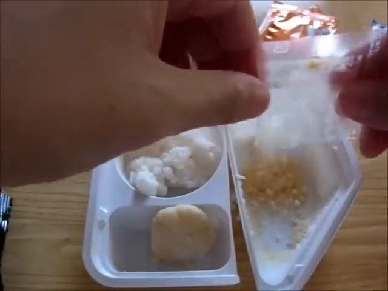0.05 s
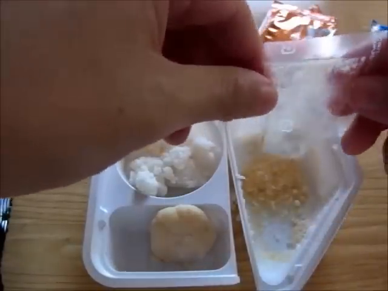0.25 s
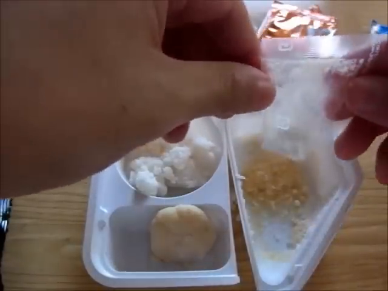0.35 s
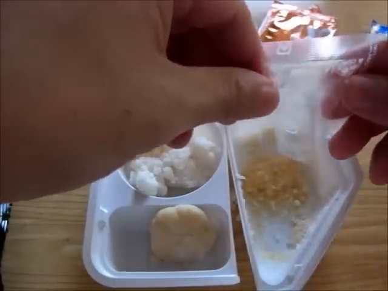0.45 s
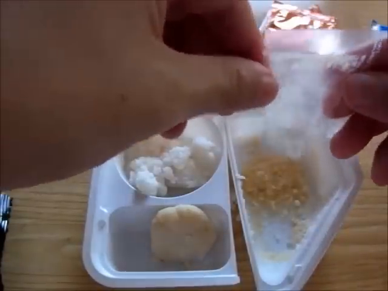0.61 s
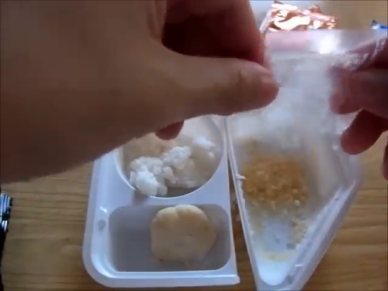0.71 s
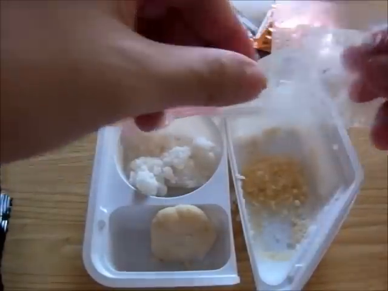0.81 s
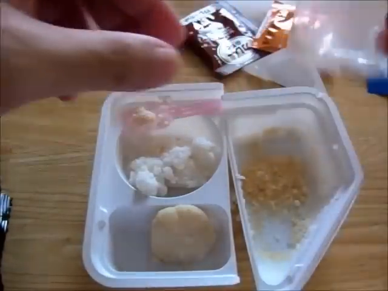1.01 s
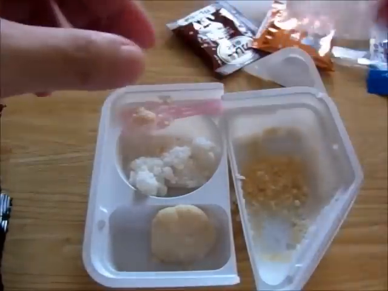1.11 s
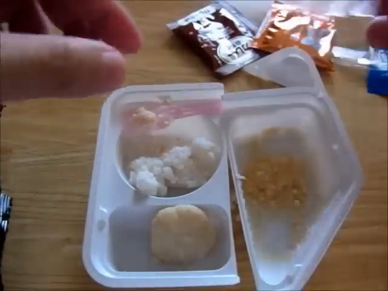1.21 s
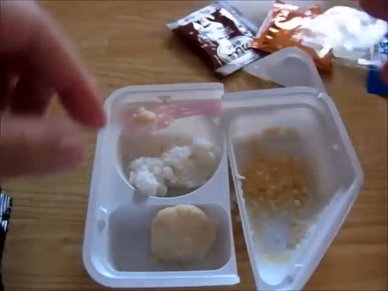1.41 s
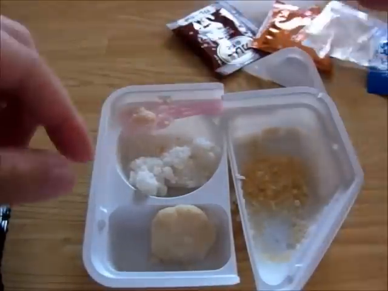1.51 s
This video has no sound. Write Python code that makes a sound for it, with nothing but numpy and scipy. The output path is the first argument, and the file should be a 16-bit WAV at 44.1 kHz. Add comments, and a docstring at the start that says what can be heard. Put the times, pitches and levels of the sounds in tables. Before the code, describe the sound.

A thin plastic sachet crinkles sharply between fingers in a quiet room, over faint hiss

```python
"""Sharp snaps of a thin plastic sachet worked by fingers, amid fine rustling and a faint steady hiss. Each snap
is a crease giving way: sines and bright modes that swell and die within a few milliseconds. Rustle is a stream
of tiny ringing clicks over dull noise; flurries are short runs of filtered clicks. Soft low and middle bumps
follow the flexing pouch, and the film now and then swells into a longer ring. Shaped noise and a thin high tone
make the background, and a near echo with a short noise tail places the sachet in a quiet room."""
import sys
import numpy as np
from scipy import signal
from scipy.fft import rfft, irfft
from scipy.io import wavfile

SR = 44100
rng = np.random.default_rng(int(sys.argv[2]) if len(sys.argv) > 2 else 0)


def bounce(signal):
    """Save signal as a 16-bit WAV file at the path given by the first command-line argument."""
    frames = np.transpose(np.atleast_2d(signal))
    limited = np.clip(frames, -1, 1)
    pcm = np.round(limited * 32767).astype(np.int16)
    wavfile.write(sys.argv[1], SR, pcm)


N = 68355  # length in samples


def amp(db):
    """Turn decibels into a gain."""
    return 10 ** (np.asarray(db) / 20)


def rms_one(x):
    """Scale a sound to an average (rms) level of 1."""
    return x / np.sqrt(np.mean(x ** 2) + 1e-20)


def bandpass(low_high_hz, x):
    """Keep the part of a sound between two frequencies."""
    return signal.sosfilt(signal.butter(2, low_high_hz, "band", fs=SR, output="sos"), x)


def add_at(out, s, x):
    """Add a short sound into a longer one, starting at s seconds."""
    out[int(s * SR):][:len(x)] += x


def burst(wave, rise, decay, t):
    """Quick swell and exponential fall, with the same energy as 1.5 ms at rms 1."""
    x = wave * (1 - np.exp(-(t / rise) ** 2)) * np.exp(-t / decay)
    return x / np.sqrt(np.sum(x ** 2) / (.0015 * SR))


HISS_DB, HISS_TOP_HZ = -53.5, 15850
WHINE_DB, WHINE_HZ = -74, 15502
# The colour of the room and microphone hiss.
# Each row: frequency in Hz, level in dB relative to the other rows.
HISS_COLOUR = [(25, -10), (193, -4.5), (281, -2.5), (648, -8.5), (826, -7), (1200, -9.5), (1900, -11),
               (4380, -14), (15500, -16)]


def hiss():
    """Steady room and microphone noise, coloured by frequency, plus a thin electrical tone."""
    at_hz, db = np.transpose(HISS_COLOUR)
    hz = np.fft.rfftfreq(N, 1 / SR) + 1  # the 1 keeps the logarithm finite
    colour = amp(np.interp(np.log(hz), np.log(at_hz), db)) * (hz < HISS_TOP_HZ)
    noise = irfft(rfft(rng.standard_normal(N)) * colour, N)
    whine = np.sin(2 * np.pi * WHINE_HZ * np.arange(N) / SR)
    return amp(HISS_DB) * rms_one(noise) + amp(WHINE_DB) * whine


ROOM_DB, ROOM_T60_S = -23, .18  # tail level; time for the tail to fall by 60 dB
# The near echo of the sachet.
# Each row: delay in seconds, level in dB against the direct sound.
NEAR_ECHOES = [(.0017, -16.5)]


def surroundings(x):
    """Sound returns as a near echo, then as many weak reflections that fade like decaying noise."""
    t = np.arange(SR // 4) / SR
    tail = rng.standard_normal(len(t)) * amp(-60 * t / ROOM_T60_S) * (t > .004)
    response = amp(ROOM_DB) * tail / np.sqrt(SR * ROOM_T60_S / 14)  # the root evens out tail length
    response[0] = 1  # direct sound
    for s, db in NEAR_ECHOES:
        response[int(s * SR)] += amp(db)
    return signal.fftconvolve(x, response)[:N]


PUFF_RISE_SHARE = .6  # swell time as a share of the decay time
# Soft swells: low and middle ones as the pouch flexes, and two bright ones near 3.3-3.5 kHz where the film
# rings longer. # Each row: start in seconds, level in dB, pitch in Hz, decay in cycles.
SOFT_SWELLS = [(.2315, -38, 940, 0.6), (.4025, -37.5, 780, 0.99), (.4585, -36, 363, 0.63),
               (.4595, -32.5, 3270, 5.3), (.6, -37, 305, .6), (.705, -41, 763, 2.2),
               (.7702, -26, 3540, 3.5), (.822, -37.5, 850, 3.3), (1.371, -54, 490, 1.3),
               (1.391, -47, 363, 3.3), (1.392, -46, 188, 1.3)]


def puffs():
    """The flexing pouch and, now and then, the film give soft swells; the longer the ring, the slower the
    swell."""
    t, out = np.arange(4096) / SR, np.zeros(N + SR)
    for s, db, hz, cycles in SOFT_SWELLS:
        decay = cycles / hz
        wave = np.sin(2 * np.pi * hz * t)
        add_at(out, s, amp(db) * burst(wave, PUFF_RISE_SHARE * decay, decay, t))
    return out[:N]


FLURRY_PER_S = 4000  # average clicks per second inside a flurry
FLURRY_SPREAD = .24  # half-width of the bright band, as a natural log of frequency
FILM_BAND_HZ = (2900, 4900)
# Flurries of tiny crackles.
# Each row: start in seconds, length in seconds, bright level in dB, bright centre in Hz, film level in dB.
CRACKLE_FLURRIES = [(0.471, 0.0063, -52, 9000, -47), (0.613, 0.0034, -41, 10500, -61),
                    (.621, 0.021, -50, 11500, -52.5), (0.6564, 0.0039, -39, 8500, -32),
                    (.672, 0.011, -50, 10500, -43.5), (0.793, .022, -44.5, 7400, -60),
                    (.822, 0.004, -48, 7000, -44.5), (0.968, .015, -45.5, 10000, -48),
                    (1.014, 0.0099, -54, 11500, -58), (1.045, 0.023, -53, 10400, -56),
                    (1.37, 0.0086, -43.5, 6800, -47.5), (1.392, 0.013, -49, 12800, -49),
                    (1.407, 0.011, -47, 11800, -56), (1.417, 0.0075, -49, 12000, -57),
                    (1.442, 0.011, -54, 11500, -56), (1.494, 0.0035, -49, 13000, -66),
                    (1.505, .01, -47.5, 11000, -57.5)]


def flurries():
    """Short runs of uneven clicks, heard as a bright band and through the film's own ring."""
    t, out = np.arange(2048) / SR, np.zeros(N + SR)
    for s, length, bright_db, centre_hz, film_db in CRACKLE_FLURRIES:
        clicks = rng.standard_normal(len(t)) * (rng.random(len(t)) < FLURRY_PER_S / SR)
        shape = np.sqrt(np.sin(np.pi * np.clip(t / length, 0, 1)) + 1e-12)  # rises and falls
        bright_hz = centre_hz * np.exp([-FLURRY_SPREAD, FLURRY_SPREAD])
        for db, band_hz in ((bright_db, bright_hz), (film_db, FILM_BAND_HZ)):
            x = bandpass(band_hz, clicks * shape)
            add_at(out, s, amp(db) * x / np.sqrt(np.sum(x ** 2) / (length * SR) + 1e-12))
    return out[:N]


def drift(rate_hz):
    """Random wandering with rms 1, slower than about rate_hz."""
    r = np.exp(-2 * np.pi * rate_hz / SR)
    wander = signal.lfilter([1], [1, -2 * r, r * r], rng.standard_normal(N + SR))
    return rms_one(wander[SR:])  # leave out the start-up second


def ring(clicks, hz, t60):
    """Clicks set a damped sine ringing, which falls by 60 dB in t60 seconds."""
    r, w = amp(-60 / (t60 * SR)), 2 * np.pi * hz / SR
    return signal.lfilter([0, np.sin(w)], [1, -2 * r * np.cos(w), r * r], clicks + 1e-18)


GRAINS_PER_S, GRAIN_SPREAD_DB = 5000, 2.8  # average rate; average extra level of a grain
GRAIN_CYCLES = 14.0  # cycles for the first resonator to fall by 60 dB


def grains(band_hz):
    """Tiny random clicks, each dealt to one of 12 resonators spread over a band; rms 1."""
    sizes = amp(GRAIN_SPREAD_DB * np.minimum(rng.exponential(1, N), 5)) * rng.choice([-1, 1], N)
    clicks = sizes * (rng.random(N) < GRAINS_PER_S / SR)
    dealt = rng.integers(0, 12, N)
    out = np.zeros(N)
    for k, hz in enumerate(np.linspace(*band_hz, 12)):
        t60 = GRAIN_CYCLES / hz
        grain = ring(ring(clicks * (dealt == k), hz, t60), hz, t60 / 2)  # two rings soften the start
        out += grain * np.sqrt(hz) / np.sin(2 * np.pi * hz / SR)
    return rms_one(out)


TREBLE_HZ, MIDDLE_HZ, BODY_HZ = (9000, 15000), (3000, 4900), (260, 850)
BODY_DB = -2.5  # dull body of the rustle, against its middle
CLUMP_DB = 1.8  # how far the level wanders
# How loud the film rustles over time.
# Each row: time in seconds, treble level in dB, middle level in dB.
RUSTLE_LEVELS = [(0, -57.5, -70), (.08, -58, -60.5), (.35, -60.5, -64.5), (.46, -58, -53.5),
                 (.55, -67, -68.5), (.62, -50.5, -55.5), (.68, -52, -54), (.74, -62.5, -62),
                 (.797, -42.5, -57.5), (.85, -54, -60), (.96, -62, -69), (.985, -53, -60.5),
                 (1.06, -58, -60), (1.07, -73, -78), (1.358, -63, -82), (1.374, -48, -53),
                 (1.41, -53, -61.5), (1.429, -53.5, -68), (1.55, -61.5, -73)]


def rustle():
    """Fine creasing under the fingers: bright and middle grains over dull noise, coming in clumps."""
    s, treble_db, middle_db = np.transpose(RUSTLE_LEVELS)
    t = np.arange(N) / SR
    clump_db = CLUMP_DB * drift(43.0)
    treble = amp(np.interp(t, s, treble_db) + clump_db)
    middle = amp(np.interp(t, s, middle_db) + clump_db)
    body = amp(BODY_DB) * rms_one(bandpass(BODY_HZ, rng.standard_normal(N)))
    return treble * grains(TREBLE_HZ) + middle * (grains(MIDDLE_HZ) + body)


FILM_RISE_S, FILM_DECAY_S = 0.00027, 0.00057
CRACKLE_RISE_S, CRACKLE_DECAY_S = 0.00044, 0.00045
CRACKLE_WIDTH_HZ, CRACKLE_WIDE_DB = 2600, -5  # width round the centre; floor shared by all modes
MODE_SPREAD_DB, MODE_SPREAD = 3.5, .025  # chance in a mode's level; in its pitch, as a natural log
# The bright modes of a crackle: a plain list of frequencies in Hz.
MODES_HZ = [5480, 6630, 7690, 8700, 10000, 10910, 11900, 12760, 13930, 14820]
# What a snap rings: first the pouch, then the panel.
# Each row: pitch in Hz, rise in seconds, decay in seconds, pitch spread between snaps as a natural log.
POUCH_AND_PANEL = [(797, 0.0004, 0.0013, 0.13), (1655, 0.00026, 0.0014, 0.12)]
# The creases that snap.
# Each row: start in seconds, pouch level in dB, panel level in dB, film level in dB, film pitch in Hz,
# crackle level in dB, crackle centre in Hz.
CREASE_SNAPS = [(0.0134, -56, -51, -45.5, 3740, -49, 11100), (0.111, -45, -39.5, -37.5, 4230, -27.5, 8900),
                (0.1373, -50, -45, -37, 4020, -29.5, 9600), (0.1429, -48, -45.5, -35.5, 3100, -43, 9800),
                (0.1894, -48, -37.5, -36.5, 3420, -34.5, 11900),
                (0.2291, -44.5, -39, -30.5, 4050, -23, 10000),
                (0.2542, -37.5, -35, -30.5, 3900, -32, 10200), (0.273, -59, -43.5, -50, 3920, -54, 7500),
                (0.2884, -61, -55, -47, 4000, -61, 8200), (0.3226, -65, -73, -69, 3770, -38.5, 11600),
                (0.376, -44, -40.5, -34, 3660, -37.5, 8000), (0.4002, -45, -37.5, -27.5, 3700, -34, 8150),
                (0.44, -34.5, -40, -20.5, 3870, -28.5, 10000), (0.4447, -42, -37, -36, 3830, -56, 9100),
                (0.4549, -36.5, -36, -61, 3390, -45, 9900), (0.4868, -44, -46, -33, 3640, -63, 7400),
                (0.4904, -41, -44, -44, 3760, -57, 8700), (0.5501, -46, -49, -34, 3670, -49, 6300),
                (0.5726, -44, -42, -38, 3550, -39, 10200), (0.5765, -48, -45, -42, 3820, -56, 9400),
                (0.5804, -41.5, -44, -27, 3670, -49, 9100), (0.5873, -66, -32.5, -32, 3840, -45, 9800),
                (0.5902, -41.5, -35.5, -31.5, 3630, -37, 10600), (0.5931, -69, -56, -52, 3970, -41, 10300),
                (0.6003, -34, -33.5, -14, 3920, -16, 9700), (0.6175, -42, -40, -34, 4020, -23.5, 11200),
                (0.6372, -48, -43, -33, 3300, -41, 9800), (0.6586, -40, -33, -26.5, 3980, -32, 6600),
                (0.6632, -32.5, -39, -38, 3620, -56, 11400), (0.6809, -38, -38, -43, 4270, -52, 5800),
                (0.6859, -37.5, -42, -18, 3580, -23.5, 10000), (0.7521, -35, -43, -39.5, 3800, -67, 12000),
                (0.7682, -41, -49, -34, 4030, -28.5, 9800), (0.7727, -37, -30, -28.5, 3660, -41, 6900),
                (0.7767, -36, -44, -24.5, 4100, -15, 9200), (0.7802, -41, -33.5, -25.5, 3850, -28, 9100),
                (0.7849, -38, -34.5, -19.5, 3900, -10.5, 8840),
                (0.8452, -43.5, -36.5, -35, 3460, -35, 6300), (0.9075, -45, -40.5, -29, 4280, -34, 7600),
                (1.0805, -66, -47, -42, 4300, -40.5, 8000), (1.3734, -62, -46, -35.5, 4020, -31.5, 13000),
                (1.3968, -61, -49, -52, 3900, -35.5, 15400)]


def snaps():
    """Each snap rings pouch, panel and film, and throws a crackle of short modes round its own centre."""
    t, modes = np.arange(1024) / SR, np.array(MODES_HZ)
    out = np.zeros(N + SR)
    for s, pouch_db, panel_db, film_db, film_hz, crackle_db, centre_hz in CREASE_SNAPS:
        x = amp(film_db) * burst(np.sin(2 * np.pi * film_hz * t), FILM_RISE_S, FILM_DECAY_S, t)
        for db, (hz, rise, decay, spread) in zip((pouch_db, panel_db), POUCH_AND_PANEL):
            snap_hz = hz * np.exp(spread * rng.standard_normal())
            x += amp(db) * burst(np.sin(2 * np.pi * snap_hz * t), rise, decay, t)
        strength, pitch, phase = rng.standard_normal((3, len(modes)))
        near_centre = np.exp(-((modes - centre_hz) / CRACKLE_WIDTH_HZ) ** 2)
        gain = (near_centre + amp(CRACKLE_WIDE_DB)) * amp(MODE_SPREAD_DB * strength)
        cycles = np.outer(modes * np.exp(MODE_SPREAD * pitch), t) + phase[:, None]
        crackle = gain @ np.sin(2 * np.pi * cycles)
        x += amp(crackle_db) * burst(crackle, CRACKLE_RISE_S, CRACKLE_DECAY_S, t)
        add_at(out, s, x)
    return out[:N]


BASS_CUT_HZ = 58


def scene():
    """Sachet in its surroundings over the hiss, with the deepest bass cut away."""
    bass_cut = signal.butter(2, BASS_CUT_HZ, "high", fs=SR, output="sos")
    sachet = signal.sosfilt(bass_cut, snaps() + puffs() + rustle() + flurries())
    return (surroundings(sachet) + hiss())[None]


TOP_HZ, CUTOFF_HZ = 15660, 16640


def record(dry):
    """The top rolls off, then a steeper filter cuts it."""
    x = signal.sosfilt(signal.butter(N=10, Wn=TOP_HZ, fs=SR, output="sos"), dry)
    return signal.sosfilt(signal.ellip(10, .5, 45, CUTOFF_HZ, fs=SR, output="sos"), x)


dry = scene()
out = record(dry)
bounce(out)
```